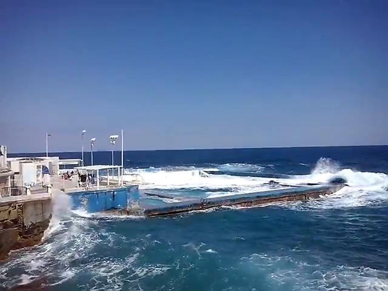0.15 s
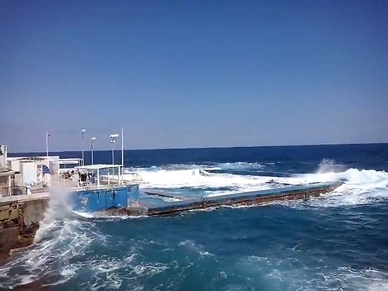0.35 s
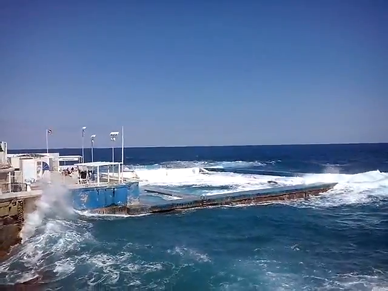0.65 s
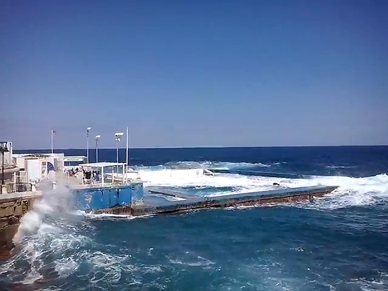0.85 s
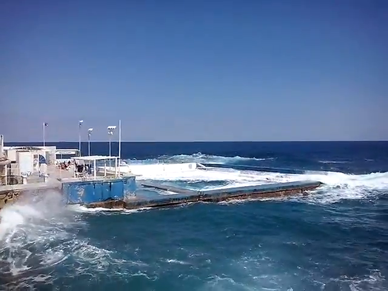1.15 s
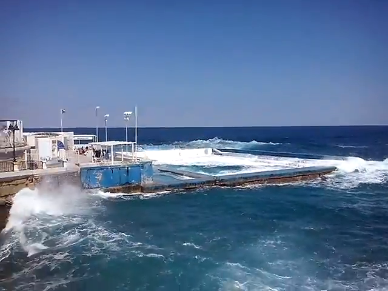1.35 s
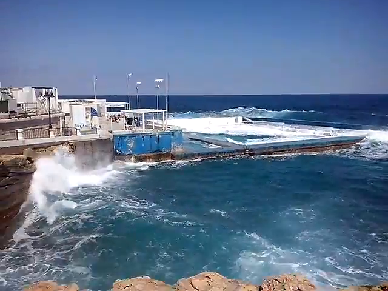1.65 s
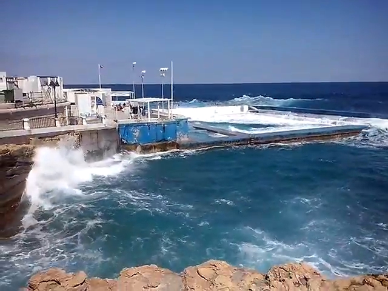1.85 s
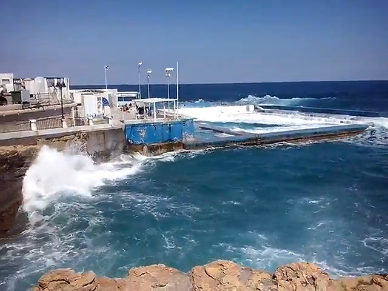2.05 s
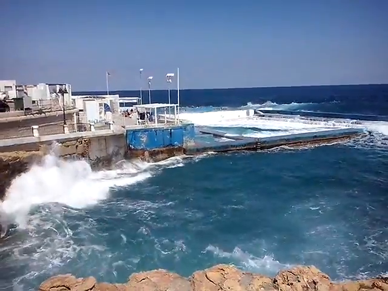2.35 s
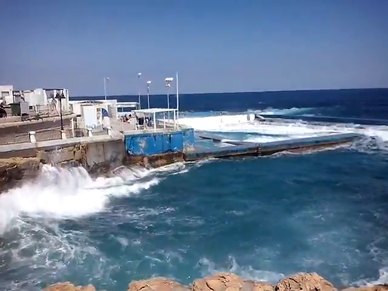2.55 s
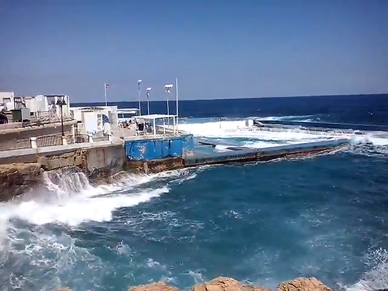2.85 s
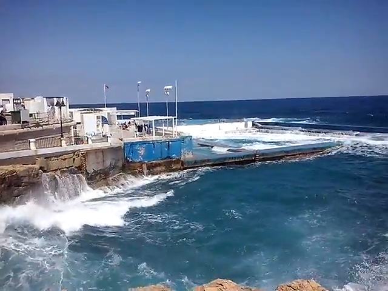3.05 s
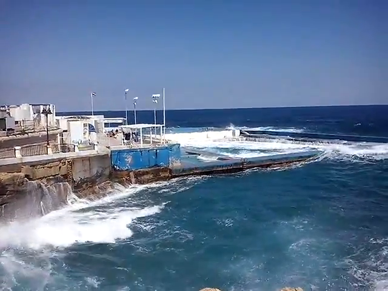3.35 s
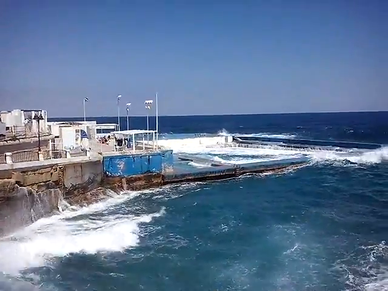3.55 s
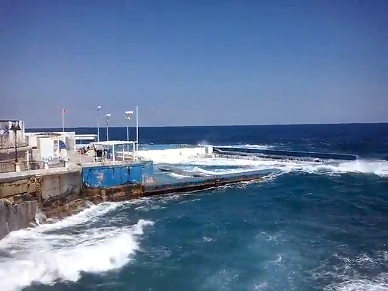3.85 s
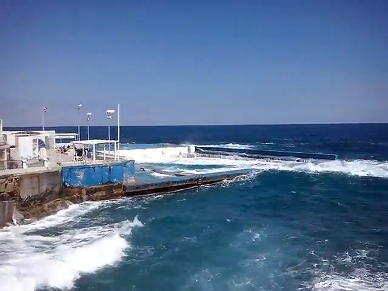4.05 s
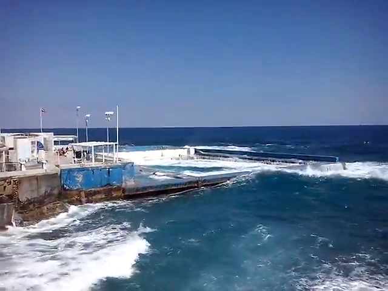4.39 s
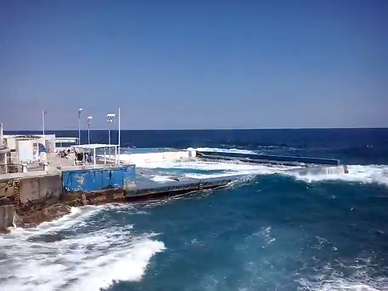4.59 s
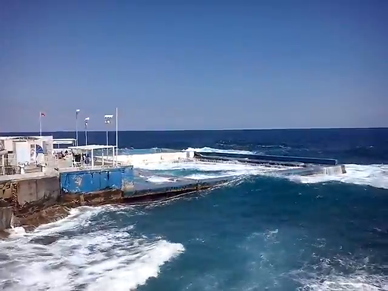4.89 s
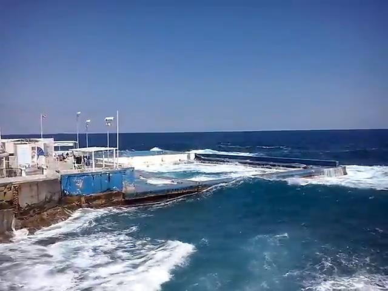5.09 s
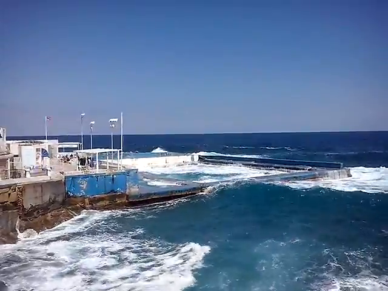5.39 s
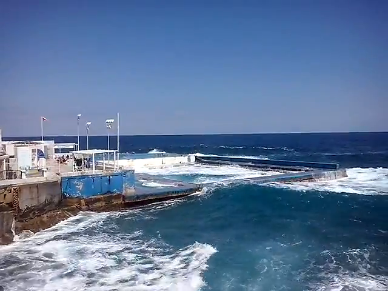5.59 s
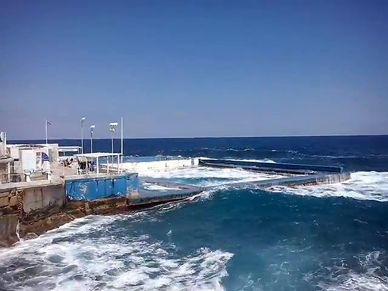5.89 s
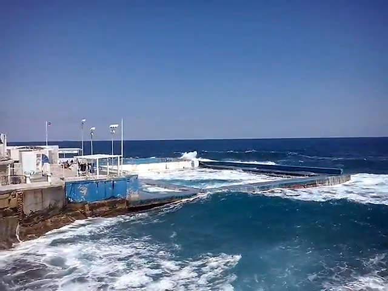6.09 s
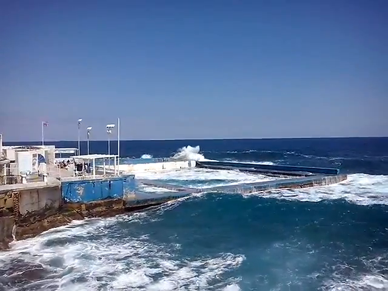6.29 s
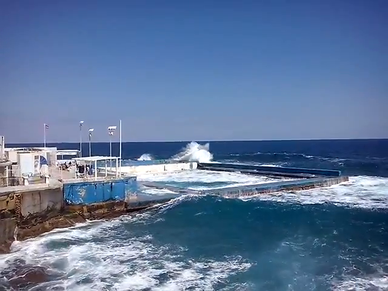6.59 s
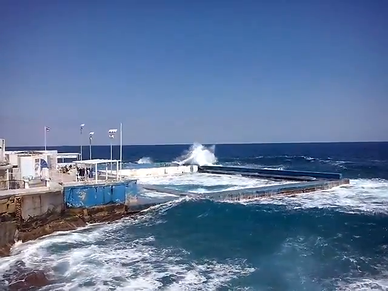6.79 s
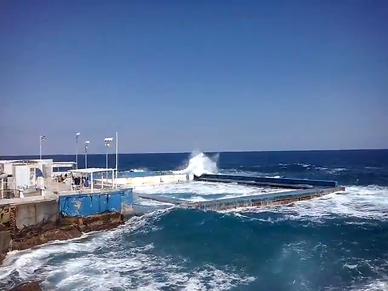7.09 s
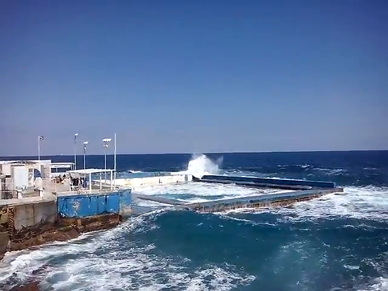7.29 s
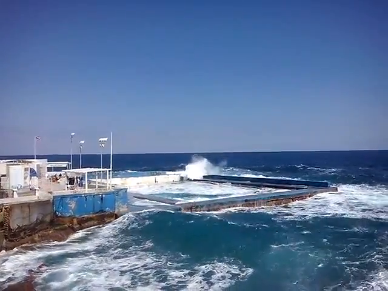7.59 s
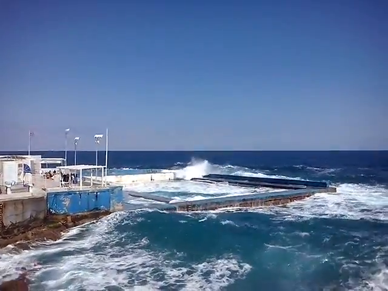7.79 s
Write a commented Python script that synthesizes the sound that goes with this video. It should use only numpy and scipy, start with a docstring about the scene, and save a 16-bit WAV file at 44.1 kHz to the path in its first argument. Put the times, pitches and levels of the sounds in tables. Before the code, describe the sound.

Rough surf rumbles and rushes throughout, heard from rocks above a concrete sea wall, with a faint low hum underneath. Gusts buffet the small microphone with low bumps from about 0.6 seconds. At 2.1 seconds a big wave hits the wall with a deep thump, and the water swells to its loudest roar until about 3 seconds. Spray hisses back down, with two lighter slaps around 3 seconds, and foam fizzes from 3.5 to about 6 seconds. After a brief surge near 4.1 seconds, another wave slaps the rocks with a sharp crack at about 4.5 seconds, followed by more rushing water and light spray. Wind buffets again around 5.8 to 6.5 seconds. A small slap comes near 6.8 seconds, and the surf continues a little softer until about 8 seconds. The loudest peaks overload slightly.

```python
"""Rough surf rumbles and rushes, heard from rocks above a concrete sea wall. Bubbles ring in the breakers,
spray rains back and foam fizzes, over a faint low hum. One wave thumps into the wall as its trapped air
is compressed; a later one slaps the rocks with a sharp crack. Gusts buffet a small microphone,
which passes only a narrow band and overloads on the loudest peaks."""
import sys
import numpy as np
from scipy import signal
from scipy.fft import rfft, irfft
from scipy.io import wavfile
from scipy.ndimage import uniform_filter1d

SR = 44100
rng = np.random.default_rng(int(sys.argv[2]) if len(sys.argv) > 2 else 0)


def bounce(signal):
    """Save signal as a 16-bit WAV file at the path given by the first command-line argument."""
    frames = np.transpose(np.atleast_2d(signal))
    limited = np.clip(frames, -1, 1)
    pcm = np.round(limited * 32767).astype(np.int16)
    wavfile.write(sys.argv[1], SR, pcm)


N = 350154
TIME = np.arange(N) / SR

# Tones under the surf. Each row: pitch in Hz, level reached at the end in dB.
HUM_TONES = [(105, -35), (157, -36.5)]
# Spectra of the sources; the peaks near 2 and 4 kHz stand for the ring of the microphone port.
# Each row: frequency in Hz, relative spectral density in dB.
RUMBLE_SPECTRUM = [(20, -25.5), (32, -13.5), (48, -12), (65, -2), (100, 0), (160, -2), (210, -3.5),
                   (350, -5), (480, -11.5), (700, -26), (1300, -39)]
ROAR_SPECTRUM = [(200, -18), (450, -1.5), (700, -3.5), (950, -1), (1250, -2), (1600, -9.5), (2000, -10),
                 (2600, -23), (4000, -48.5)]
WHITE_WATER_SPECTRUM = [(700, -38), (1200, -12), (1600, -3.5), (1880, 1), (2060, -3.5), (2300, -11.5),
                        (2700, -20.5), (3500, -24.5), (6000, -52.5)]
SPRAY_SPECTRUM = [(1800, -16), (2600, -1.5), (3100, -3), (3800, -3), (5400, 0.5), (6500, 1), (7200, -6),
                  (8000, -22.5)]
FOAM_SPECTRUM = [(3000, -26.5), (3600, -9.5), (4000, -4.5), (4300, -1), (4650, -4), (5000, -12),
                 (5700, -24.5), (6600, -8.5), (7100, -14.5), (8000, -7)]
CRACK_SPECTRUM = [(120, -21), (330, -7), (600, -10), (1000, -3), (1500, 2.5), (1950, 6.5), (2600, -17),
                  (3400, -19), (4300, -9), (5300, -20), (6500, -14), (8000, -29)]
# Surges of breaking water. Each row: start in seconds, length in seconds, surf strength in dB.
SURF_SURGES = [(.07, 0.54, -33), (1.36, 0.83, -27), (2.06, 0.72, -21), (2.91, 1.4, -26.5), (4.1, 0.12, -22),
               (4.552, 1.405, -27), (6.072, 0.29, -25.5), (6.745, 1.13, -31)]
# Falling spray and spreading foam. Each row: start in seconds, length in seconds, level in dB.
SPRAY_SHEETS = [(2.107, 0.11, -28), (2.42, 0.8, -32), (3.134, 0.46, -30.5), (4.748, 1.08, -40)]
FOAM_CARPETS = [(3.5, 1.86, -35), (5.546, 0.58, -34)]
# Gusts that swell the rumble. Each row: centre in seconds, Gaussian width in seconds, level in dB.
WIND_GUSTS = [(.66, 0.11, -23), (1.24, 0.081, -28), (1.49, 0.05, -22), (1.99, 0.048, -22), (2.22, .09, -22),
              (4.12, .13, -28.5), (5.8, 0.093, -21.5), (6.38, 0.16, -22), (7.1, 0.33, -27.5),
              (7.93, 0.066, -25)]
# Eddies striking the microphone. Each row: start in seconds, relative peak level in dB, pitch in Hz.
WIND_EDDIES = [(0.63, -11, 120), (1.167, -13.5, 109), (1.232, -10, 65.6), (1.725, -15, 130),
               (1.753, -7.5, 158), (2.243, -13, 149), (2.67, -11, 190), (4, -11.5, 400), (4.024, -13, 170),
               (4.166, -13.5, 88), (4.196, -11, 98), (4.854, -14, 109), (4.918, -7, 127), (5.274, -14, 97),
               (6.262, -11.5, 135), (6.317, -10.5, 200), (6.342, -7, 110), (6.418, -12, 223),
               (6.493, -14.5, 151)]
# Blows of water on wall and rocks. Each row: start in seconds, thump level in dB, thump pitch in Hz,
# crack level in dB, decay time in seconds.
WAVE_IMPACTS = [(0.097, -19, 405, -19, 0.015), (2.101, -3.5, 138.8, -11.5, 0.023),
                (2.884, -21, 200, -14, 0.016), (3.113, -21, 200, -17.5, 0.023), (4.54, -7, 351, -4, 0.019),
                (4.556, -14, 410, -11.5, 0.018), (4.575, -15, 100, -12, 0.095),
                (6.823, -20.5, 200, -21, 0.023)]

# How the sea's voices follow the surf. Each pair: level in dB at usual surf, dB gained per dB of surf.
RUMBLE_LAW, ROAR_LAW, WATER_LAW = (-26, 0.15), (-28.5, 0.4), (-24.5, 0.75)
SPRAY_LAW, FOAM_LAW = (-37, 0.28), (-36, 0.7)
USUAL_SURF_DB = -25


def undb(db):
    """Amplitude grows tenfold for every 20 dB."""
    return 10 ** (np.asarray(db) / 20)


def unit(x):
    """Normalisation to an rms of 1."""
    return x / np.sqrt(np.mean(x ** 2))


def power_sum(*gains):
    """Incoherent sounds add in power."""
    return np.sqrt(sum(g ** 2 for g in gains))


def colour(x, spectrum):
    """Filtering imposes a spectrum, falling steeply beyond its ends; the result has rms 1."""
    hz, db = np.transpose(spectrum)
    log_f = np.log(np.arange(N // 2 + 1) * SR / N + 1)
    beyond = np.maximum(np.log(hz[0]) - log_f, 0) + np.maximum(log_f - np.log(hz[-1]), 0)
    gain = undb(np.interp(log_f, np.log(hz), db)) / (1 + beyond) ** 10
    return unit(irfft(rfft(x) * gain, N))


def wander(per_s):
    """Random steps, smoothed twice, give a slow fluctuation of rms 1."""
    hold = max(int(SR / per_s), 2)
    steps = np.repeat(rng.standard_normal(N // hold + 1), hold)
    return unit(uniform_filter1d(uniform_filter1d(steps, hold), hold)[:N])


def grains(per_s, spread_db):
    """Shot noise: independent impulses, many small and a few large."""
    chance, size = rng.random(N), rng.exponential(size=N)
    return (chance < per_s / SR) * rng.choice([-1, 1], N) * undb(spread_db * np.minimum(size, 5))


def swell(start, length, rise_s, release_s):
    """An envelope rises linearly, holds for the rest of its length and decays exponentially."""
    age = TIME - start
    return np.clip(age / rise_s, 0, 1) * np.exp(-np.maximum(age - length, 0) / release_s)


def add(out, start, sound):
    """Superposition: a sound joins the mix at its start time."""
    i = int(start * SR)
    out[i:i + len(sound)] += sound[:N - i]


def hum(waver_hz=3, waver_db=3.0, growth_db_per_s=0.76):
    """Random modulation of pitch and level makes two faint, slowly growing tones waver."""
    out = 0
    for hz, db in HUM_TONES:
        phase = 2 * np.pi * np.cumsum(hz + waver_hz * wander(10)) / SR
        tone = unit(np.sin(phase) * undb(waver_db * wander(10)))
        out = out + tone * undb(db)
    return out * undb(growth_db_per_s * (TIME - TIME[-1]))


def rumble(flutter_db=0.77):
    """Turbulence in heavy water and wind makes uneven bass noise."""
    return colour(rng.standard_normal(N), RUMBLE_SPECTRUM) * undb(flutter_db * wander(25))


def bubbles(low_hz, high_hz, per_s, spread_db, cycles, patchy_db, sizes):
    """Each bubble is a damped resonator rising in pitch; those of one size form a cloud."""
    out = 0
    for hz in np.geomspace(low_hz, high_hz, sizes):
        age = np.arange(int(SR * cycles / hz)) / SR * hz / cycles  # 0 to 1 over a 60 dB decay
        ring = np.sin(2 * np.pi * cycles * age * (1 + age / 10)) * np.exp(-np.log(1000) * age)
        cloud = unit(signal.oaconvolve(grains(per_s, spread_db), ring)[:N])
        out = out + np.sqrt(hz) * cloud * undb(patchy_db * wander(14))
    return unit(out)


def roar(churn_db=0.16, bubble_db=-3):
    """Breakers fold in air: large bubbles resonate, the distant ones blurring into noise."""
    near = bubbles(408, 1630, per_s=300, spread_db=2.9, cycles=9.6, patchy_db=0.5, sizes=14)
    blur = colour(rng.standard_normal(N), ROAR_SPECTRUM)
    rush = blur + undb(bubble_db) * colour(near, ROAR_SPECTRUM)
    return unit(rush) * undb(churn_db * wander(21))


def white_water(churn_db=0.5, bubble_db=-4):
    """Smaller bubbles resonate higher, making the rush of the tumbling crests."""
    near = bubbles(1315, 2910, per_s=500, spread_db=2.5, cycles=13, patchy_db=0, sizes=8)
    blur = colour(rng.standard_normal(N), WHITE_WATER_SPECTRUM)
    rush = blur + undb(bubble_db) * colour(near, WHITE_WATER_SPECTRUM)
    return unit(rush) * undb(churn_db * wander(16))


def spray(drops_per_s=6000, flicker_db=0.47):
    """Drops raining back on rock and sea are independent impacts that sum to a hiss."""
    patter = unit(grains(drops_per_s, spread_db=2.4)) + rng.standard_normal(N)
    return colour(patter, SPRAY_SPECTRUM) * undb(flicker_db * wander(22))


def foam(pops_per_s=9000, seethe_db=1.2):
    """Countless tiny bubbles burst, and their pressure pulses merge into a fizz."""
    fizz = unit(grains(pops_per_s, spread_db=1.4)) + rng.standard_normal(N)
    return colour(fizz, FOAM_SPECTRUM) * undb(seethe_db * wander(11))


def surf_strength(calm_db=-29.5):
    """Surges build and drain, adding in power to the calm; the sum is in dB."""
    surges = [undb(db) * swell(start, length, rise_s=0.055, release_s=0.1)
              for start, length, db in SURF_SURGES]
    return 20 * np.log10(power_sum(undb(calm_db), *surges))


def follow(law, surf_db):
    """A voice's amplitude grows as a power of the surf's strength."""
    db, slope = law
    return undb(db + slope * (surf_db - USUAL_SURF_DB))


def thump(hz, decay_s, spread, cutoff_ratio=2.82):
    """A damped, narrow-band pressure pulse: a few uneven swings around a pitch, peaking near 1."""
    t = TIME[:SR // 4]
    band = signal.butter(2, [hz / (1 + spread / 2), hz * (1 + spread / 2)], "band", fs=SR, output="sos")
    noise = signal.sosfilt(band, rng.standard_normal(2 * len(t)))
    # Keeping only the phase gives swings that differ in length but hardly in size.
    phase = np.angle(signal.hilbert(noise))
    rounding = signal.butter(3, cutoff_ratio * hz, fs=SR, output="sos")
    swings = signal.sosfilt(rounding, np.cos(phase))[-len(t):]
    envelope = (1 - np.exp(-t / (0.15 * decay_s))) * np.exp(-t / decay_s)
    return swings * envelope / envelope.max()


def wind_buffets(gain_db=-1):
    """Eddies press on the microphone port; the larger the eddy, the lower and longer its pulse."""
    out = np.zeros(N)
    for start, db, hz in WIND_EDDIES:
        decay_s = 0.02 * (130 / hz) ** 0.54  # 20 ms at 130 Hz
        add(out, start, undb(db + gain_db) * thump(hz, decay_s, spread=1.42))
    return out


def wave_impacts(rise_s=0.0023):
    """A wave face hits stone: trapped air thumps like a spring and the water bursts in a crackle."""
    out, t = np.zeros(N), TIME[:SR // 4]
    crackle = colour(grains(per_s=9000, spread_db=1.0), CRACK_SPECTRUM)
    for start, thump_db, hz, crack_db, decay_s in WAVE_IMPACTS:
        envelope = (1 - np.exp(-t / rise_s)) * np.exp(-t / decay_s)
        crack = crackle[int(start * SR):][:len(t)] * envelope
        add(out, start, undb(thump_db) * thump(hz, decay_s, spread=0.55) + undb(crack_db) * crack)
    return out


def scene(collapse_rumble_db=-23.5, collapse_roar_db=-28):
    """Sources superpose: the surf drives the sea's five voices, and wind, blows and hum add to them."""
    surf_db = surf_strength()
    collapse = swell(start=2.06, length=0.92, rise_s=0.092, release_s=0.14)  # big wave along the wall
    gusts = [undb(db) * np.exp(-((TIME - centre) / width) ** 2 / 2) for centre, width, db in WIND_GUSTS]
    sheets = [undb(db) * swell(start, length, rise_s=0.11, release_s=0.27)
              for start, length, db in SPRAY_SHEETS]
    carpets = [undb(db) * swell(start, length, rise_s=0.21, release_s=0.22)
               for start, length, db in FOAM_CARPETS]
    sea = (rumble() * power_sum(follow(RUMBLE_LAW, surf_db), undb(collapse_rumble_db) * collapse, *gusts)
           + roar() * power_sum(follow(ROAR_LAW, surf_db), undb(collapse_roar_db) * collapse)
           + white_water() * follow(WATER_LAW, surf_db)
           + spray() * power_sum(follow(SPRAY_LAW, surf_db), *sheets)
           + foam() * power_sum(follow(FOAM_LAW, surf_db), *carpets))
    return (sea + wind_buffets() + wave_impacts() + hum())[None]


def record(dry, low_cut_hz=50, high_cut_hz=7150, sampling_hz=16000, leak_db=-29, ceiling=0.82):
    """Band limiting and overload: the microphone loses deep bass and high treble and clips peaks."""
    thin = signal.sosfilt(signal.butter(3, low_cut_hz, "high", fs=SR, output="sos"), dry)
    narrow = signal.sosfilt(signal.cheby1(12, 0.1, high_cut_hz, fs=SR, output="sos"), thin)
    # Slow sampling mirrors a faint image of the top of the band just above it.
    mirror = 2 * narrow * np.cos(2 * np.pi * sampling_hz * TIME)
    leak = signal.sosfilt(signal.butter(4, [8300, 8950], "band", fs=SR, output="sos"), mirror)
    clipped = np.clip(narrow + undb(leak_db) * leak, -ceiling, ceiling)
    soft = signal.sosfilt(signal.butter(1, 11000, fs=SR, output="sos"), clipped)
    return signal.sosfilt(signal.ellip(8, 0.2, 70, 16000, fs=SR, output="sos"), soft)


dry = scene()
out = record(dry)
bounce(out)
```